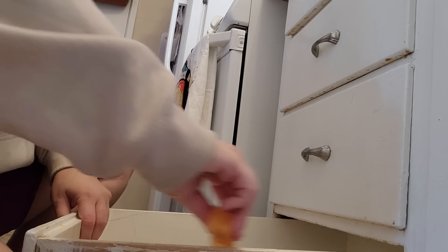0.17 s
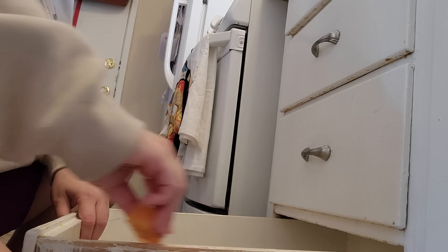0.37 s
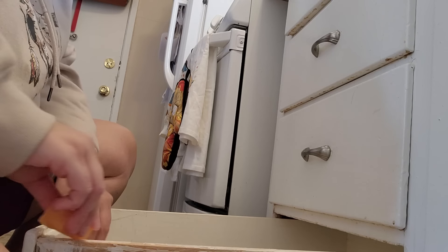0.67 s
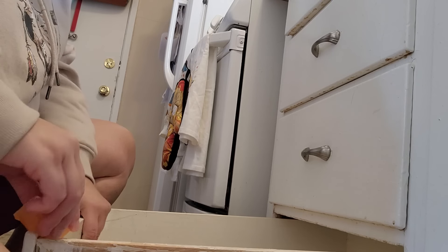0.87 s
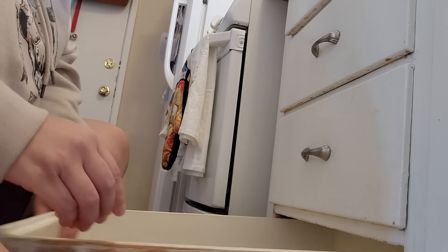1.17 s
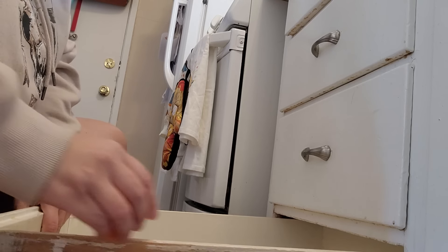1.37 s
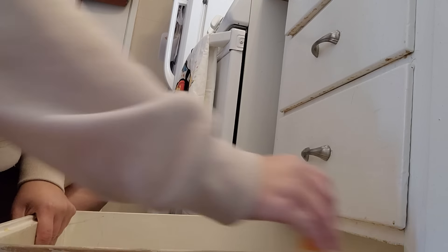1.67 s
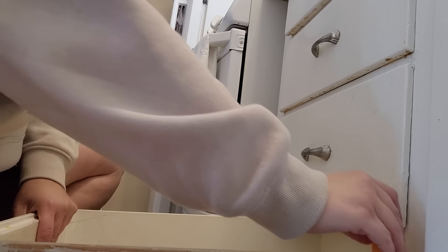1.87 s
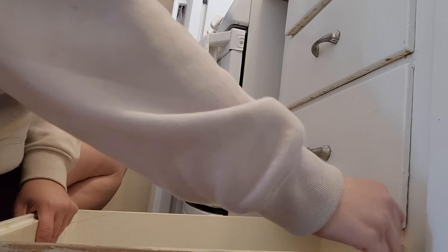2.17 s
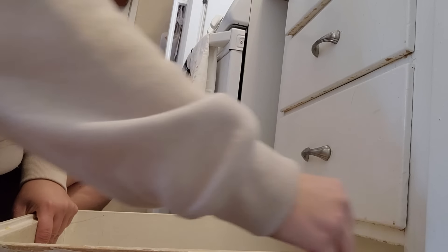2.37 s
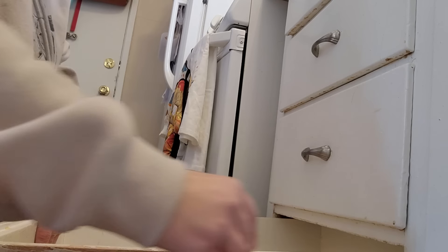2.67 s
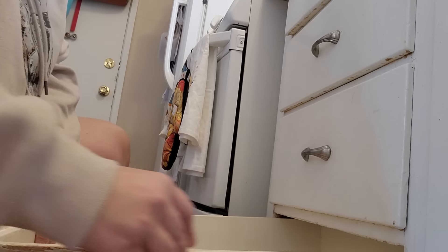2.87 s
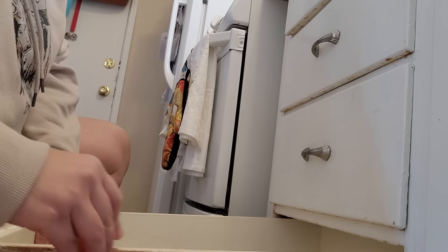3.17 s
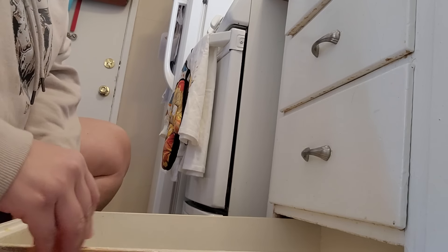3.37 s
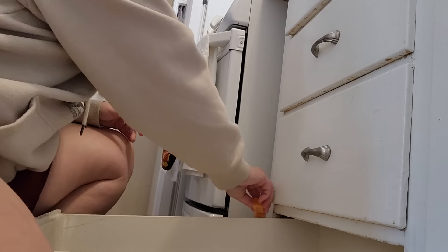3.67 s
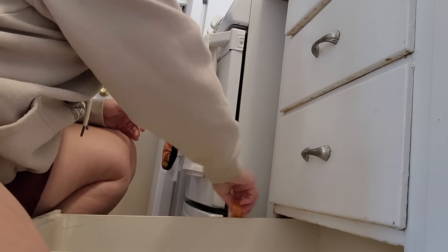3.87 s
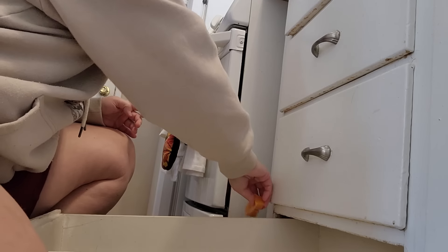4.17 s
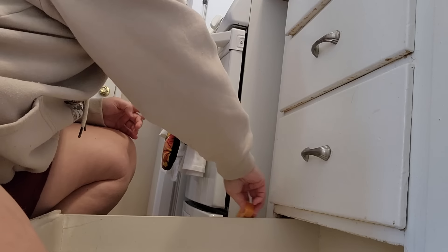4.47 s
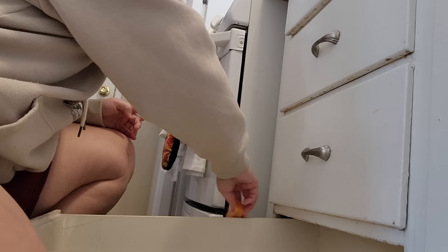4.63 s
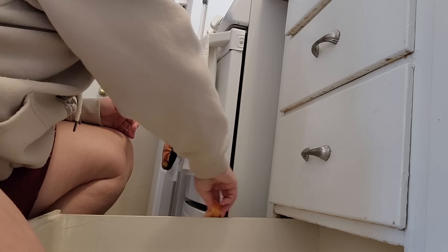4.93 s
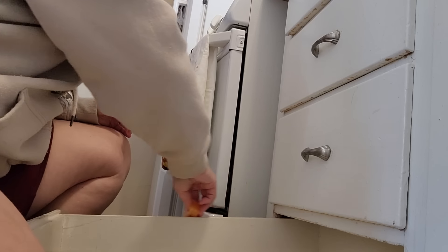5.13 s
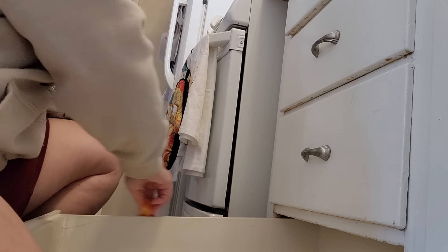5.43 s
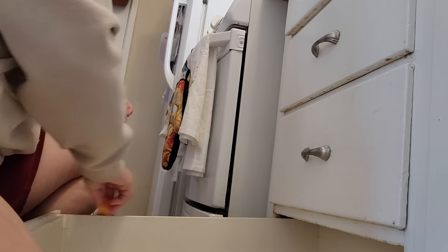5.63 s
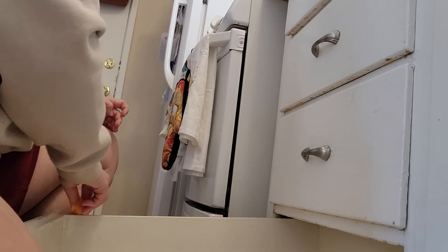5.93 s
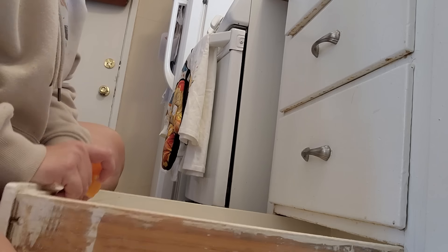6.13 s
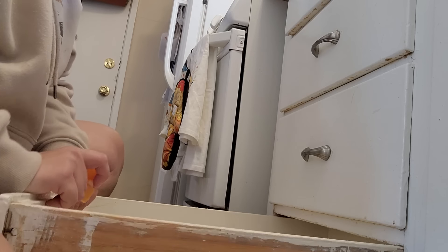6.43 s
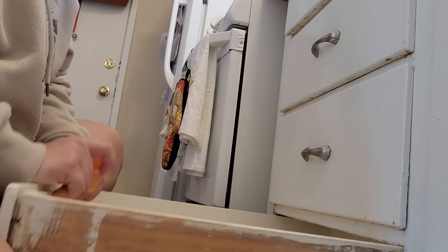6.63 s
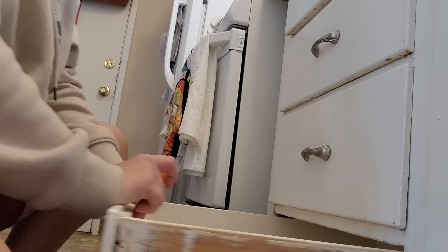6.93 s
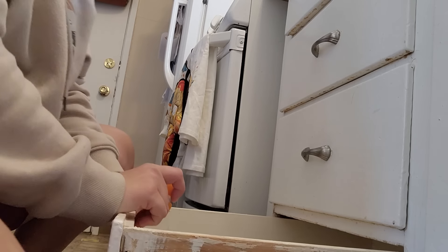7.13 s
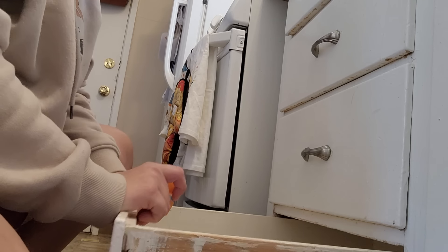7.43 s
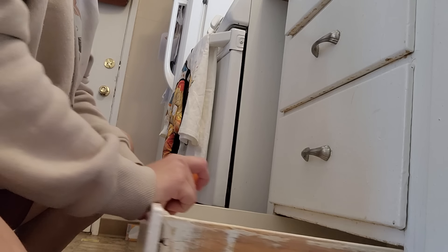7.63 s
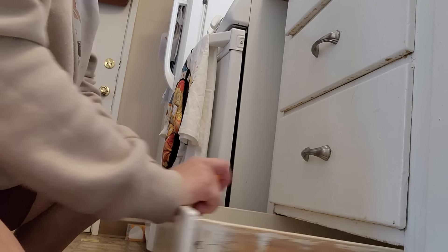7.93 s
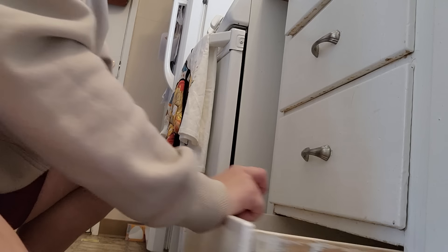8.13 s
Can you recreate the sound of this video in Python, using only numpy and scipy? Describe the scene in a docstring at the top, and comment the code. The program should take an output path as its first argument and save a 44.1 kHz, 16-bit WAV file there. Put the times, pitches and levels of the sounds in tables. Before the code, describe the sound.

Dry, gritty rubbing of wax on thin wooden boards, uneven and stuttering, with dull knocks, tiny ticks and low panel thumps. The first half is sparse: brief scrapes, soft slides, two clear wooden knocks near the middle. Then the drawer shifts with heavy thuds, and vigorous hissing strokes and cabinet rumble follow until the cut. Heard close in stereo, in a small quiet kitchen with a faint steady noise floor.

```python
"""A block of wax rubs along the edges of an open wooden drawer: stick-slip friction hisses and excites the thin boards.
Blows on the wood ring damped board modes, brief dry ticks crack as noise bursts, and judders swing the bottom panel.
Low noise rumbles in the cabinet under the hand, then as the drawer slides home; decaying noise tails give reflections.
A phone with two ports lies close by in a quiet kitchen, heard as a faint steady noise floor."""
import sys
import numpy as np
from scipy import signal
from scipy.fft import rfft, irfft
from scipy.io import wavfile
from scipy.ndimage import uniform_filter1d, map_coordinates

SR = 44100
rng = np.random.default_rng(int(sys.argv[2]) if len(sys.argv) > 2 else 0)


def put_to_file(sound):
    """Save the sound as 16-bit audio at rate SR, in the file named by the first command-line argument."""
    columns = np.atleast_2d(sound).T  # one column per channel
    safe = np.clip(columns, -1, 1)
    whole_steps = np.round(safe * 32767)
    wavfile.write(sys.argv[1], SR, whole_steps.astype(np.int16))


N = 366030
TIME = np.arange(N) / SR
HZ = np.arange(N // 2 + 1) * SR / N + 1e-3  # the offset keeps log(HZ) finite

# Noise floor of the kitchen: f/Hz, relative spectral level/dB
KITCHEN = [(15, -37), (25, -6.5), (103, 2), (231, -18), (515, -14), (621, -24.5), (1150, -27.5),
           (7280, -32.5), (8320, -31), (9270, -85.5), (15000, -44)]
# Likeness of the noise at the two ports: f/Hz, likeness/1 (0 to 1)
ALIKE = [(60, 0.96), (130, 1), (290, 0.9), (640, 1), (1410, 0), (3100, 0.28), (6820, 0.15), (15000, 0)]
# Starts of the successive places of the hand: t/s
PLACES_S = [0, .95, 1.7, 3.55, 6.1, 9]
# Long strokes, one curve each: t/s, grit hiss level/dB, bottom panel level/dB, cabinet rumble level/dB
STROKES = [
    [(0.06, -70, -40, -48), (0.084, -75, -49, -56), (0.124, -63, -42, -49), (0.296, -61, -42.5, -41.5),
     (0.418, -69, -42, -45), (0.45, -63.5, -43, -53), (0.492, -69, -46.5, -43.5), (0.61, -68, -51, -47.5),
     (0.628, -69, -49.5, -44), (0.76, -77, -58.5, -54)],
    [(1.05, -58, -51.5, -62), (1.1, -49, -48, -52.5), (1.126, -44.5, -71, -56), (1.168, -49, -49, -46),
     (1.196, -47.5, -41, -56), (1.224, -45, -43.5, -49), (1.268, -52, -50.5, -56), (1.284, -50, -48, -57),
     (1.33, -67.5, -48.5, -42)],
    [(1.9, -94, -68.5, -85), (2.134, -66.5, -56.5, -55), (2.584, -55, -40, -49), (2.91, -58, -49.5, -65),
     (2.95, -62.5, -46.5, -80), (2.978, -62.5, -46.5, -58), (3.144, -68, -52.5, -51.5),
     (3.252, -73, -59, -83), (3.348, -70.5, -52, -50), (3.52, -78, -55, -70)],
    [(4.62, -78, -67, -78), (4.648, -67, -55, -55), (5.074, -68, -53, -62), (5.082, -69.5, -57, -78),
     (5.168, -67.5, -55, -62), (5.508, -60, -48.5, -53), (5.724, -68.5, -57, -58), (5.774, -79, -58.5, -72),
     (5.9, -70, -67, -79), (5.95, -84, -65, -59)],
    [(6.6, -60, -49, -43), (6.672, -58, -47, -36), (6.682, -48, -53, -33), (6.714, -43, -44, -31),
     (6.89, -50.5, -41, -45), (6.914, -51.5, -51, -42), (6.94, -49.5, -41, -72), (6.97, -56, -51, -58),
     (6.994, -51, -64, -58), (7.0, -53, -50, -51)],
    [(7.44, -64, -51, -63), (7.47, -56, -48, -43), (7.49, -56.5, -48, -43.5), (7.528, -50.5, -49.5, -45.5),
     (7.598, -60, -41, -41), (7.638, -55, -58, -49), (7.66, -53, -42, -39), (7.684, -56.5, -47, -41),
     (7.744, -56.5, -54, -50), (7.78, -71, -58, -51)],
    [(7.8, -59, -58, -47), (7.854, -56, -51.5, -70), (7.904, -56.5, -53, -54), (7.936, -52, -56, -76),
     (7.96, -53, -56.5, -53), (8.014, -51, -45.5, -45), (8.086, -57.5, -39.5, -53),
     (8.13, -53.5, -50, -31.5), (8.254, -51, -44, -42), (8.3, -51.5, -44, -66)],
]
# Ring of the side boards above the grit, one value for each stroke: level/dB
BOARDS_DB = [3.5, -27, -1.5, 4, -2, -1.5, 0]
# Short scuffs and bumps: t/s, rise/s, fall/s, then level/dB of grit, side boards, bottom panel, cabinet rumble
SCUFFS = [(0.018, 0.0318, .04, -61.5, -44, -33.5, -48), (0.809, .03, 0.059, -51.5, -54, -37.5, -47),
          (1.429, 0.23, 0.056, -57, -76, -49.5, -47.5), (1.49, .04, 0.066, -66, -82, -45.5, -43),
          (1.548, 0.099, 0.071, -52, -71, -52, -61), (1.659, 0.028, 0.095, -72.5, -83, -56.5, -56),
          (1.8, 0.11, 0.56, -70.5, -71.5, -65.5, -69), (3.631, 0.018, 0.1, -62, -44.5, -42.5, -50),
          (3.86, 0.052, 0.078, -52, -46, -39, -46), (4.305, .015, 0.065, -61.5, -46, -34.5, -44),
          (4.368, 0.01, 0.029, -55, -64, -47, -47.5), (4.48, 0.12, .14, -64, -63, -50.5, -65),
          (4.2, .06, 0.023, -96, -89, -68.5, -56.5), (6.01, .02, 0.052, -62, -73, -67, -59),
          (6.165, 0.024, 0.047, -54, -50, -42, -39), (6.244, 0.057, 0.086, -49.5, -49, -40.5, -33),
          (6.358, 0.037, 0.084, -48, -47, -35.5, -27), (6.45, .1, 0.049, -53, -52.5, -42, -40.5),
          (6.539, 0.039, 0.041, -47.5, -51.5, -39, -36.5),
          (7.029, 0.059, 0.064, -52.5, -45.5, -35.5, -32.5), (7.14, 0.067, .06, -72.5, -67, -55.5, -47.5),
          (7.3, 0.047, 0.045, -73, -58, -60, -67), (7.37, 0.042, .1, -63.5, -53, -52, -68),
          (8.12, 0.021, 0.062, -46, -51, -39.5, -30)]
# Factor on the rise time of grit, boards, panel, cabinet: factor/1
SET_OFF = [1.08, 1.02, 1, .8]
# Factor on the fall time of grit, boards, panel, cabinet; heavier parts ring on: factor/1
RING_ON = [0.96, 1, 1.63, 2.73]
# Grit, boards, panel, cabinet under the resting hand: level/dB
REST_DB = [-80, -92, -73.5, -64]
# Resonances of the rubbed near edge: f/Hz, width/Hz, relative level/dB
NEAR_EDGE = [(850, 110, -1.5), (1140, 13, -15), (1446, 78, 3.5), (1680, 34, -10.5), (2110, 32, 3),
             (2460, 76, -4), (2860, 240, -9), (4290, 79, -23), (5230, 160, -8), (6190, 96, -25),
             (7660, 66, -37.5)]
# Resonances of the cabinet runners: f/Hz, width/Hz, relative level/dB
RUNNERS = [(1940, 65, -3.5), (2012, 21, 0), (2158, 66, 2), (3290, 120, -2.5), (3640, 110, -2.5),
           (3880, 43, -5), (4200, 87, -2.5), (5120, 520, -1.5), (6850, 48, -19), (7590, 330, -5)]
# Resonances of the near edge gripped further along: f/Hz, width/Hz, relative level/dB
NEAR_AGAIN = [(850, 250, -4.5), (1390, 60, -6), (1590, 33, -8), (2169, 38, 1), (2730, 180, -11),
              (3420, 75, -7), (4000, 57, -23), (5430, 160, -9.5), (6280, 170, -11), (7600, 65, -39),
              (7660, 68, -23), (8080, 100, -14)]
# Resonances of the far edge: f/Hz, width/Hz, relative level/dB
FAR_EDGE = [(810, 210, -5), (1345, 39, 5), (2107, 34, 6), (2320, 24, -1.5), (2610, 120, 0),
            (3550, 74, -1.5), (3730, 33, -33), (4210, 110, -21.5), (5490, 160, -3.5), (6130, 56, -26.5),
            (6460, 34, -50.5), (8350, 160, -14)]
# Broad woody body under every stroke: f/Hz, width/Hz, relative level/dB
BODY = [(475, 240, -7.5), (950, 760, -12)]
# Hiss of grit on the edge: f/Hz, relative spectral level/dB
GRIT = [(530, -4.5), (900, -1), (1100, -10), (1230, -5), (1650, -8), (1800, -6.5), (2820, -10.5),
        (4740, -11), (6350, -17), (7360, -12.5), (9300, -35.5), (12100, -71.5), (20500, -120)]
# Top treble of the friction: f/Hz, relative spectral level/dB
SIZZLE = [(5470, -38.5), (9300, -43.5), (9950, 5.5), (12300, 14.5), (14300, 9), (15700, 8)]
# Cabinet under the rubbing hand: f/Hz, relative spectral level/dB
SHAKE = [(12, -53.5), (20, -12), (45, -4), (64, 2), (97, -5.5), (130, 1.5), (170, -29), (290, -120)]
# Cabinet under the sliding drawer: f/Hz, relative spectral level/dB
RUMBLE = [(12, -34.5), (20, -12.5), (48, 5), (64, -0.5), (91, -7.5), (130, 1.5), (170, -14), (290, -120)]
# Juddering bottom panel: f/Hz, relative spectral level/dB
PANEL = [(53, -33), (90, -26.5), (140, -2), (204, 0.5), (226, -6.5), (306, -13.5), (333, -12.5), (376, -9),
         (420, -20.5), (550, -29), (920, -120)]
# Blows on the boards: t/s, nominal peak level/dB, spot f/Hz, hardness/(dB per octave), factor on ring time/1
KNOCKS = [(0.007, -20.5, 853, 3.5, 0.92), (0.799, -37.5, 495, 10.5, 0.77), (1.013, -49, 900, -1.5, 0.91),
          (1.217, -35.5, 473, -3, 0.83), (1.973, -51, 454, -14, 1), (2.044, -44, 380, -4.5, 0.44),
          (2.343, -28, 354, 1.5, 0.99), (2.861, -41, 775, 2, 1), (3.56, -48, 393, -4.5, 0.8),
          (3.601, -46.5, 450, -5, 0.8), (3.629, -17, 404, 5, 0.89), (3.848, -28, 460, -2, 0.8),
          (4.298, -19.5, 590, 0, 0.98), (4.359, -30.5, 393, -0.5, 0.59), (5.026, -42, 396, -4, 0.83),
          (6.144, -46, 1330, 9, 1), (6.267, -34.5, 620, -2, 0.5), (6.349, -39.5, 382, 10.5, 0.38),
          (6.511, -38.5, 620, 2, 0.94), (6.544, -35, 616, 8, 0.74), (6.691, -29, 710, -0.5, 1),
          (7.012, -28.5, 610, 1.5, 0.85), (7.298, -53, 956, 16, 0.78), (7.356, -42, 960, 7, 0.8),
          (8.116, -27, 482, -3, 0.34)]
# Modes of the struck boards before scatter: f/Hz, relative level/dB, t60/s
BOARD_MODES = [(265, 5, 0.093), (333.6, 2.5, 0.27), (387.8, -1, 0.24), (475.3, -2.5, 0.25),
               (545, -1.5, 0.057), (618.3, -4, 0.21), (693, -7.5, 0.068), (771, -3.5, 0.16),
               (849, 4.5, 0.025), (954.5, 2, 0.055), (1020, -10, 0.035), (1165, -9.5, 0.027),
               (1270, -7, 0.086), (1594, -15, 0.071), (1560, -21, .09), (1860, -46.5, 0.027),
               (2100, -22.5, .08), (2050, -22.5, 0.041), (2316, -19.5, 0.064), (2590, -25.5, .07),
               (2850, -26, 0.049), (3080, -43, .06), (3520, -22, 0.057)]
# Judders of the bottom panel, the lowest through the cabinet: t/s, peak level/dB, f/Hz, t60 once damped/s
BOOMS = [(.009, -20.5, 206, 0.054), (.174, -33, 212.5, 0.093), (.253, -27.5, 215.6, .13),
         (.434, -30, 193, .045), (.797, -33, 171, 0.16), (1.091, -37, 205, 0.12), (1.183, -35, 177, .09),
         (1.308, -40.5, 72.6, 0.11), (1.976, -43.5, 182, 0.22), (2.344, -30, 191, 0.18),
         (2.534, -33.5, 146.4, .058), (3.628, -30.5, 140, .059), (3.859, -33.5, 186, 0.13),
         (4.298, -34, 144, 0.072), (4.653, -40.5, 172, 0.13), (4.758, -40, 163, .08),
         (5.235, -37.5, 158, .078), (5.346, -39.5, 185, 0.14), (5.452, -35.5, 189, 0.058),
         (5.483, -31.5, 173, 0.14), (5.509, -31.5, 179, 0.07), (5.556, -33.5, 173, 0.12),
         (5.666, -40, 167, 0.12), (5.901, -45, 167, .08), (6.134, -39.5, 144, 0.065),
         (6.233, -24.5, 172.4, 0.21), (6.254, -20.5, 185.3, .063), (6.348, -19.5, 157.5, .025),
         (6.514, -18.5, 209, 0.072), (6.692, -12, 200.4, .079), (6.741, -14, 181, 0.06),
         (6.769, -25, 195.4, 0.16), (6.881, -23, 204, 0.11), (7.008, -21, 153, 0.055),
         (7.049, -30, 159, 0.14), (7.655, -32, 61.3, .13), (8.114, -25, 170.7, 0.046),
         (8.132, -25, 59.4, .11), (8.134, -27, 163, .07)]
# Small dry ticks: t/s, peak level/dB, colour f/Hz
TICKS = [(0.69, -49.5, 3000), (0.7978, -38.5, 4170), (1.2144, -31.5, 5030), (1.646, -46.5, 2450),
         (4.2995, -43, 2560), (2.3442, -39, 1880), (3.602, -50.5, 2040), (4.3717, -42.5, 1810),
         (6.0052, -45, 3770), (6.144, -50.5, 1840), (6.352, -44, 2190), (6.515, -52, 1810),
         (6.6798, -36, 4840), (6.7377, -35.5, 1990), (7.3571, -34, 1920), (8.1164, -31, 1890)]
# Sensitivity of the left port over the right: f/Hz, level difference/dB
BALANCE_DB = [(60, 1), (110, -0.5), (200, 1.5), (380, 1.5), (700, 1.5), (1290, 2.5), (2380, 4), (4400, 5),
              (8120, 4.5), (15000, -0.5)]

KITCHEN_DB = -65
LIFT_DB_PER_S = 498.5  # slope of level before and after each stroke curve
SCUFF_RANGE_DB = 20  # level change spanned by one rise or fall time
RUMBLE_WANDER_DB = 2.5
PUSH_S, HOLD_CYCLES = .0062, 1.6  # rise and hold of a panel swing
PANEL_LAG_S = .0002  # extra delay of the panel's boom at the right port
CONTACT_S = .0012  # time constant of the wax settling on the board
BOX_T60_S, BOX_DB = 0.085, 2  # reflections: decay time, and level before their bass cut
RIGHT_LAG = 9  # samples
BOTTOM_HZ, TOP_HZ = 32.8, 15740  # band limits of the ports


def undb(db):
    """Level to amplitude: twenty decibels per factor of ten."""
    return 10 ** (np.asarray(db) / 20)


def unit(x):
    """Normalisation of mean power to 1."""
    return x / np.sqrt(np.mean(x ** 2))


def on_hz(table):
    """Linear interpolation of a spectrum along logarithmic frequency."""
    hz, value = np.transpose(table)
    return np.interp(np.log(HZ), np.log(hz), value)


def add(track, s, sound):
    """Superposition: sum a sound into a track from time s."""
    i = max(int(s * SR), 0)
    track[..., i:i + sound.shape[-1]] += sound[..., :N - i]


def walk(rate):
    """Slow random modulation: normal levels held for 1 / rate s, then smoothed by a moving average."""
    k = int(SR / rate)
    held = np.repeat(rng.standard_normal(N // k + 1), k)
    return uniform_filter1d(held, k)[:N]


def resonances(modes):
    """Power sum of damped resonances, each a peak with steep skirts."""
    power = 0
    for hz, width, db in modes:
        power = power + undb(2 * db) / (1 + (2 * (HZ - hz) / width) ** 2) ** 1.28
    return np.sqrt(power)


def by_place(sounds):
    """Change of the excited body: one sound for each place of the hand, in turn."""
    return np.choose(np.searchsorted(PLACES_S, TIME, "right") - 1, sounds)


def friction(colour, scatter_db, rate, slip_db):
    """Stick-slip excitation: dense uneven grains, slipping in level, drive a body; the ports share mostly bass."""
    size = np.minimum(rng.exponential(size=N), 4)
    level_db = scatter_db * size + slip_db * walk(rate)
    mid, side = rfft(rng.standard_normal((2, N)) * undb(level_db))
    alike = np.clip(on_hz(ALIKE), 0, 1)
    mid = mid * np.sqrt(1 + alike)
    side = side * np.sqrt(1 - alike)
    return unit(irfft(np.array([mid + side, mid - side]) * colour, N))


def kitchen():
    """Ambient noise: a filtered random field with a slight wander of level."""
    return undb(KITCHEN_DB) * friction(undb(on_hz(KITCHEN)), scatter_db=0, rate=4, slip_db=2)


def pressure():
    """Addition of independent powers: resting hand, strokes and scuffs set the gain of each vibrating part."""
    power = undb(REST_DB)[:, None] ** 2 * np.ones(N)
    for curve, boards_db in zip(STROKES, BOARDS_DB):
        s, *db = np.transpose(curve)
        outside = np.abs(TIME - np.clip(TIME, s[0], s[-1]))
        lifted = LIFT_DB_PER_S * outside  # the stroke dies as the wax leaves the wood
        grit_db, panel_db, rumble_db = (np.interp(TIME, s, d) - lifted for d in db)
        power = power + undb([grit_db, grit_db + boards_db, panel_db, rumble_db]) ** 2
    t = np.arange(-SR // 3, SR // 2) / SR
    for s, rise, fall, *db in SCUFFS:
        before = -t / max(rise, .005) / np.array(SET_OFF)[:, None]
        after = t / max(fall, .005) / np.array(RING_ON)[:, None]
        down = np.where(t < 0, before, after)
        puff = undb(np.array(db)[:, None] - SCUFF_RANGE_DB * down) ** 2
        start = s + t[0]
        add(power, start, puff[:, max(int(-start * SR), 0):])
    return np.sqrt(power)


def stroke(grit, boards):
    """Friction-driven resonance: grit hisses and rings the wood; the top treble grows faster than the hiss."""
    upper = 1 / np.sqrt(1 + (1800 / HZ) ** 6)  # above 1800 Hz the ring follows the grit, below it the boards
    low, high = [], []
    # the quick return stroke, second here, rings wide, like the runners
    for modes in (NEAR_EDGE, RUNNERS, NEAR_AGAIN, FAR_EDGE, RUNNERS):
        low_colour = resonances(modes + BODY) * (1 - upper)
        low.append(friction(low_colour, scatter_db=4, rate=34.0, slip_db=4.0))
        high.append(friction(resonances(modes) * upper, scatter_db=4, rate=28.0, slip_db=3.5))
    hiss = friction(undb(on_hz(GRIT)), scatter_db=3.5, rate=43.0, slip_db=2.85)
    sizzle = friction(undb(on_hz(SIZZLE)), scatter_db=2.5, rate=77.0, slip_db=2.5)
    rubbed = grit * (hiss + undb(-8.0) * by_place(high))
    return rubbed + boards * by_place(low) + undb(4) * grit ** 1.535 * sizzle


def patches(x, patch_db, per_s, per_octave):
    """Local variation of friction: as the wax moves along the grain, each narrow band swells and fades."""
    hz, s, z = signal.stft(x, SR, nperseg=1024)
    band = per_octave * np.log2(1 + hz / 200)
    rows, columns = np.meshgrid(band, per_s * s, indexing="ij")
    field = map_coordinates(rng.standard_normal((80, 400)), [rows, columns], order=1, mode="wrap")
    return signal.istft(z * undb(patch_db * field), SR)[1][:, :N]


def load(panel, rumble):
    """Forced vibration: panel and cabinet shake under the weight of the hand, then of the sliding drawer."""
    shake, slide = (friction(undb(on_hz(c)), scatter_db=0, rate=15, slip_db=2.5) for c in (SHAKE, RUMBLE))
    judder = friction(undb(on_hz(PANEL)), scatter_db=0, rate=25, slip_db=2.5)
    wander = undb(RUMBLE_WANDER_DB * walk(11.0))
    return panel * judder + rumble * wander * by_place([shake] * 4 + [slide])


def knocks():
    """Impulse response of damped modes: a short rough contact rings most the modes near the pitch of the spot."""
    out, t = np.zeros(N), np.arange(SR // 3) / SR
    # sides and front make close trios of modes
    hz, mode_db, t60 = np.repeat(np.transpose(BOARD_MODES), repeats=3, axis=1)[:, :, None]
    chance = rng.standard_normal((len(KNOCKS), 2, len(hz), 1))
    rough = rng.standard_normal((len(KNOCKS), SR // 20))
    soften = signal.butter(2, 4500, fs=SR, output="sos")  # wax is soft
    for (s, db, spot_hz, hard_db, share), (spot, detune), grain in zip(KNOCKS, chance, rough):
        scatter = undb(2 * spot) * np.sign(spot)  # modes start in or out, a little unevenly
        near_db = 10.0 / (1 + (np.log2(hz / spot_hz) / 0.12) ** 2)
        gain = scatter * undb(mode_db + hard_db * np.log2(hz / 600) + near_db)
        pitch = hz * (1 + .04 * detune)
        decay = np.exp(-np.log(1000) * t / (t60 * share))
        ring = (gain * decay * np.sin(2 * np.pi * pitch * t)).sum(0)
        ring = ring * (1 - np.exp(-t / CONTACT_S))
        ring = ring * (1 + 0.63 * np.exp(-t / 0.0023))  # first swings stand out, the hand damps the rest
        early = t[:len(grain)]
        force = np.exp(-early / 1e-4) + 0.041 * grain * np.exp(-early / .003)
        ring = signal.sosfilt(soften, signal.fftconvolve(ring, force))
        nominal_peak = np.sqrt(8 * np.mean(ring[:SR // 50] ** 2))  # 9 dB over the rms of the first 20 ms
        add(out, s, undb(db) * ring / nominal_peak)
    return out


def booms():
    """Damped oscillation: a soft push swings the panel up, it holds a cycle or two, then the grip damps it."""
    out, t = np.zeros((2, N)), np.arange(SR // 4) / SR
    late = np.maximum(t - np.array([[0], [PANEL_LAG_S]]), 0)
    for s, db, hz, t60 in BOOMS:
        damped = np.maximum(late - PUSH_S - HOLD_CYCLES / hz, 0)
        swing = np.minimum(late / PUSH_S, 1) * np.exp(-np.log(1000) * damped / max(t60, .02))
        add(out, s, undb(db) * swing * np.sin(2 * np.pi * hz * late))
    return out


def ticks():
    """Transient broadband excitation: a brief noise burst with a broad spectral peak of its own colour."""
    out, t = np.zeros(N), np.arange(SR // 30) / SR
    lowpass = signal.butter(6, 8500, fs=SR, output="sos")
    for (s, db, hz), noise in zip(TICKS, rng.standard_normal((len(TICKS), len(t)))):
        b, a = signal.iirpeak(hz, 2.5, fs=SR)
        crack = (signal.lfilter(b, a, noise) + 0.055 * noise) * np.exp(-t / 0.0015)
        crack = signal.sosfilt(lowpass, crack)
        add(out, s, undb(db) * crack / np.abs(crack).max())
    return out


def box(x):
    """Reverberation in drawer and cabinet: decaying noise tails, weak in bass, unlike per port, new each half second."""
    out, t, hop = x.copy(), np.arange(SR // 3) / SR, SR // 2
    highpass = signal.butter(1, 350, "high", fs=SR)
    for i in range(-hop, N, hop):
        tail = rng.standard_normal((2, len(t))) * np.exp(-np.log(1000) * t / BOX_T60_S)
        tail = tail / np.sqrt((tail ** 2).sum(1, keepdims=True))
        tail = signal.lfilter(*highpass, tail)
        start = max(i, 0)
        part = x[:, start:i + 2 * hop]
        fade = np.sqrt(np.hanning(2 * hop))[max(-i, 0):][:part.shape[1]]
        reflected = signal.fftconvolve(part * fade, tail, axes=1)
        add(out, start / SR + 1e-6, undb(BOX_DB) * reflected)  # 1e-6 s guards the sample index from rounding down
    return out


def scene():
    """Superposition with path difference: the drawer is a little nearer the left port."""
    grit, boards, panel, rumble = pressure()
    rub = patches(stroke(grit, boards), patch_db=2.5, per_s=14., per_octave=6.)
    near = box(rub + knocks() + ticks()) + load(panel, rumble) + booms()
    near[1] = np.concatenate([np.zeros(RIGHT_LAG), near[1]])[:N]
    return near + kitchen()


def record(dry):
    """Receiver response: port sensitivities differ by frequency, deepest bass drops and the top is cut steeply."""
    lean = on_hz([(max(hz, 1), db) for hz, db in BALANCE_DB]) / 2
    bass_cut = np.sqrt(1 + (BOTTOM_HZ / HZ) ** 4)
    ports = irfft(rfft(dry) * undb([lean, -lean]) / bass_cut, N)
    return signal.sosfilt(signal.ellip(14, .2, 80, TOP_HZ, fs=SR, output="sos"), ports)


dry = scene()
out = record(dry)
put_to_file(out)
```